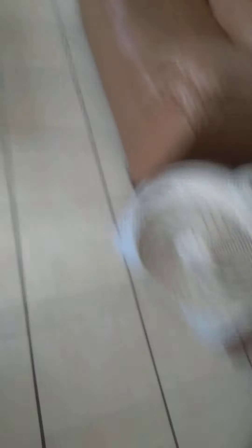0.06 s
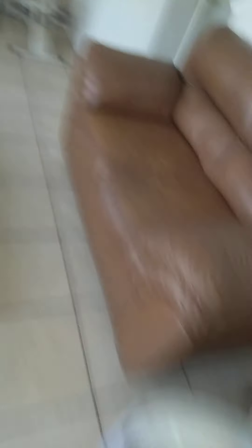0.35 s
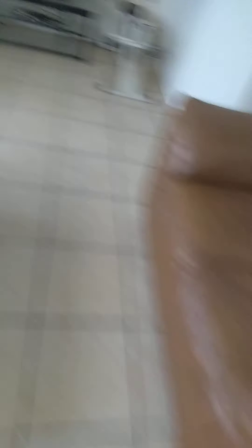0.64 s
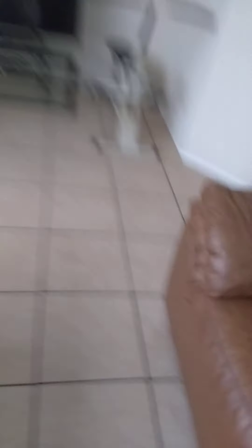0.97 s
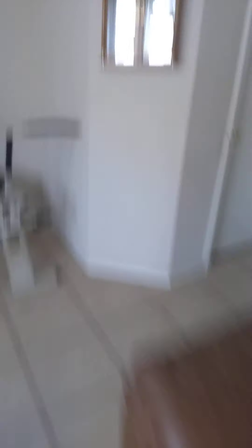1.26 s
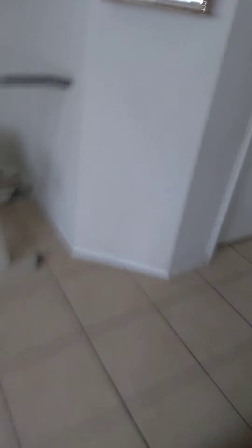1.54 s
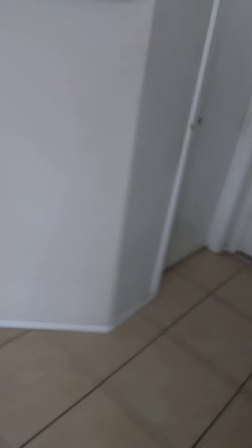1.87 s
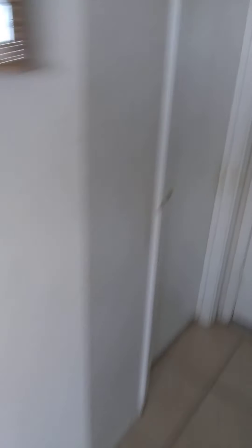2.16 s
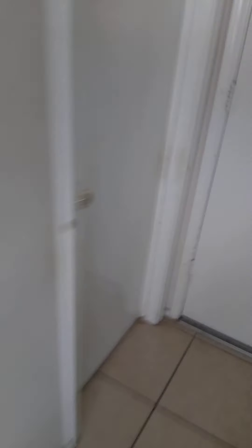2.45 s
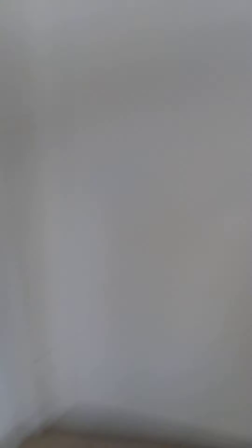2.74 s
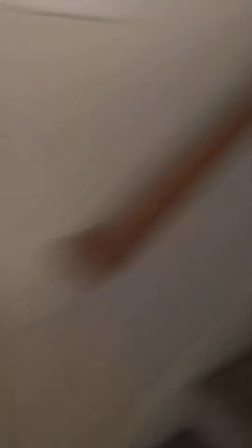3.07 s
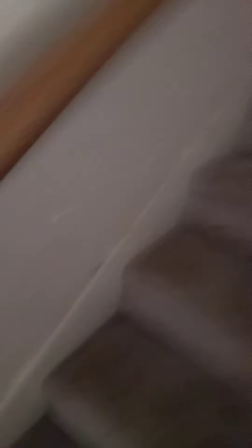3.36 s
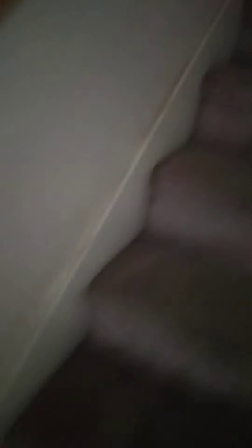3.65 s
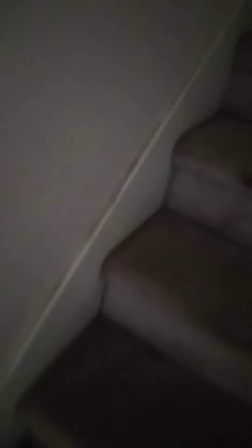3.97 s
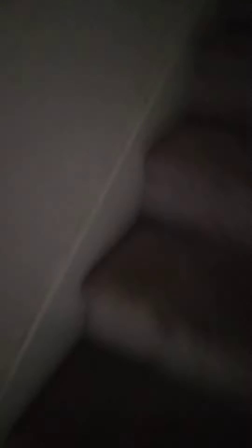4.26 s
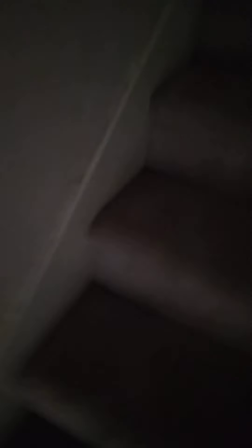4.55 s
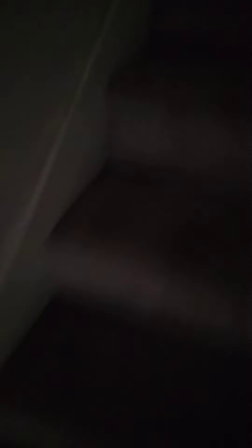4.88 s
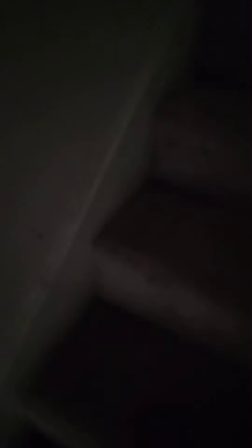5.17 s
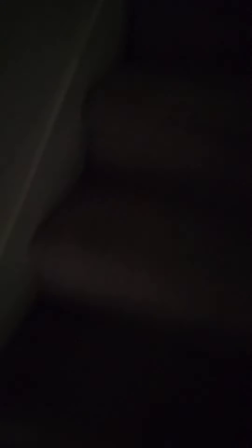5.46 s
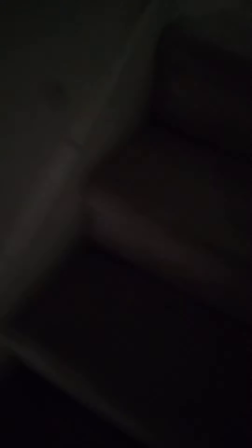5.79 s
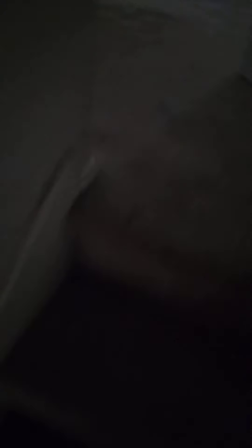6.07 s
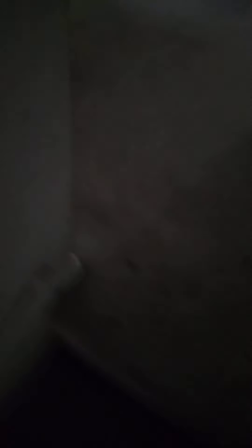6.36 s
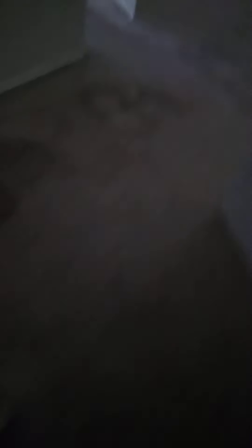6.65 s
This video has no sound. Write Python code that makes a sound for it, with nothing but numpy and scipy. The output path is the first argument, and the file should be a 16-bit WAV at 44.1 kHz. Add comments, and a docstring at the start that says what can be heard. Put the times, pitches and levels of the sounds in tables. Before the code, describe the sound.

Heard from a microphone carried by the walker, brisk footsteps cross a bare tiled room with hard slaps, sliding soles and soft bumps of air. They then change to quick, even thuds climbing a carpeted wooden staircase, which booms underfoot and cracks sharply once near the end. Clothes rustle throughout, and a fan rushes faintly in the background.

```python
"""Footsteps over a tiled floor, then up a carpeted wooden staircase, on the stereo microphone of a
camera that the walker carries. In a live room with a faint fan, heels and soles slap and scuff on the
tile; on the stairs each foot knocks the tread, crunches the pile and sets the staircase booming.
Close by, clothes rustle and moving air bumps the microphone."""
import sys
import numpy as np
from scipy import signal
from scipy.fft import rfft, irfft
from scipy.io import wavfile
from scipy.ndimage import uniform_filter1d

SR = 44100
rng = np.random.default_rng(int(sys.argv[2]) if len(sys.argv) > 2 else 0)


def put_to_file(sound):
    """Save the sound as 16-bit audio at rate SR, in the file named by the first command-line argument."""
    columns = np.atleast_2d(sound).T  # one column per channel
    safe = np.clip(columns, -1, 1)
    whole_steps = np.round(safe * 32767)
    wavfile.write(sys.argv[1], SR, whole_steps.astype(np.int16))


N = 305172
TIME = np.arange(N) / SR

# slaps on tile: t/s, hollow heel/dB, flat sole/dB, bright snap/dB
TILE_SLAPS = [(0.5545, -26.5, -25, -44), (0.758, -35, -35.5, -101), (0.944, -33.5, -35.5, -58.5),
              (1.175, -35, -47.5, -67), (1.231, -39.5, -57, -69), (1.373, -38.5, -29.5, -50),
              (1.7044, -34.5, -35.5, -59), (1.766, -43, -37, -53), (1.838, -37, -34.5, -56),
              (2.187, -42, -35, -77), (2.215, -47, -40.5, -53), (2.323, -40, -31.5, -49),
              (2.716, -36.5, -33.5, -55.5), (2.863, -45, -47, -57), (3.202, -29, -29, -53.5)]
# feet landing on stairs: t/s, knock/dB, tread tuning/ratio, boom/dB, boom pitch/Hz, boom t60/s,
# delay of the weight/s, crunch/dB, pad/dB, left minus right/dB, brush/dB, skim/dB
LANDINGS = [(3.199, -31.5, 0.73, -44, 76.1, 0.59, 0.011, -43.5, -47.5, 1.5, -56.5, -54.5),
            (3.576, -21.5, 1, -41.5, 69.4, 0.45, 0.0027, -42.5, -39.5, 0, -50, -46.5),
            (3.863, -24.5, 0.8, -28.5, 70.6, 0.24, 0.012, -49, -41, 2, -53.5, -57),
            (4.192, -26, 1.07, -22, 66.4, 0.31, 0.0082, -42, -41, 2, -55, -53),
            (4.486, -26.5, 1.125, -25, 66.4, 0.24, .019, -45.5, -43.5, 2, -52, -72),
            (4.801, -26, 1.06, -24, 62.3, 0.31, 0.011, -45, -36, 2, -56.5, -49.5),
            (5.096, -26.5, 1.32, -23, 58.2, .28, 0.01703, -46, -42, -0.5, -49.5, -54.5),
            (5.395, -28.5, 1.07, -14.5, 58.3, 0.14, 0.0087, -43, -39.5, 3, -57, -49),
            (5.699, -32, .95, -27, 58.4, 0.27, 0.01275, -51.5, -50, 3.5, -54, -53.5),
            (5.993, -24, 0.88, -22, 64.9, 0.22, 0.0092, -48.5, -37.5, 2, -56, -51.5),
            (6.275, -27.5, 0.69, -28, 65.6, 0.24, 0.011, -46.5, -41.5, 4.5, -50.5, -56),
            (6.58, -25.5, 0.85, -31.5, 68, 0.23, 0.0121, -44, -37, 2.5, -55, -50),
            (6.876, -28, 1.22, -41, 72.6, 0.26, 0.0018, -46.5, -40, 3.5, -49, -44)]
# how briskly the walker moves: t/s, shuffle of soles/dB, rustle of clothes/dB
BRISKNESS = [(0.0, -48.5, -62.5), (0.79, -53.5, -61), (1.02, -59.5, -69.5), (1.39, -55.5, -60.5),
             (1.54, -65.5, -69), (2.72, -57, -67), (3.03, -60, -73.5), (3.35, -60, -69), (4.14, -65, -71),
             (4.35, -55.5, -62.5), (4.63, -58.5, -64), (4.93, -59.5, -69), (5.95, -58.5, -67),
             (6.21, -55, -65), (6.34, -61, -66.5), (6.92, -55, -65.5)]
# spectrum of a flat, hard contact: f/Hz, level/dB
SLAP_SPECTRUM = [(60, -22.5), (150, 0.5), (350, -6.5), (800, 2), (1400, -3.5), (2200, -7), (4000, -46)]
# reverberation of the stairwell: f/Hz, t60/s
STAIRWELL_DECAY = [(100, 0.54), (400, 0.44), (1000, 0.18), (3000, 0.22)]


def gain_of(db):
    """Decibels to amplitude."""
    return 10 ** (np.asarray(db) / 20)


def unit_rms(x):
    """Scales to rms 1."""
    return x / np.sqrt(np.mean(x ** 2) + 1e-20)


def read(points, hz):
    """Reads a table on a log-frequency axis."""
    f, value = np.transpose(points)
    return np.interp(np.log(hz + 1), np.log(f + 1), value)


def add(mix, s, sound):
    """Adds a sound to the mix at time s."""
    part = mix[:, max(round(s * SR), 0):][:, :sound.shape[1]]
    part += sound[:, :part.shape[1]]


def stroke(at, db, half):
    """A bell-shaped swell and fade around time at."""
    return gain_of(db) * np.exp(-.5 * np.minimum(((TIME - at) / half) ** 2, 200))


def colour(x, spectrum, size=4096):
    """Minimum-phase filter of unit energy with the given spectrum."""
    log_gain = np.log(gain_of(read(spectrum, abs(np.fft.fftfreq(size, 1 / SR)))))
    taps = np.fft.ifft(np.exp(np.conj(signal.hilbert(log_gain)))).real[:size // 2]
    return signal.oaconvolve(x, taps[None] / np.linalg.norm(taps), axes=1)[:, :N]


def grit(grain_db, size=90):
    """Two noises whose strength jumps together, in grains of size samples."""
    grains = unit_rms(uniform_filter1d(rng.standard_normal(N), size))
    return unit_rms(rng.standard_normal((2, N)) * gain_of(grain_db * np.clip(grains, -2.5, 2.5)))


def impacts(times, levels_db, spectrum, rise, fall, t60, wet_db, grain_db=2.0):
    """Gritty contacts that swell over rise s and die over fall s, each with the room's diffuse tail."""
    force, t = np.zeros((1, N)), TIME[:SR // 2]
    shape = (1 - np.exp(-(t / rise) ** 2)) * np.exp(-t / fall)
    for s, db in zip(times, levels_db):
        add(force, s, gain_of(db) * shape[None] / shape.max())
    keep = np.exp(-2 * np.log(1000) / (t60 * SR))  # share of energy the room keeps per sample
    stored = signal.lfilter([1 - keep], [1, -keep], force ** 2 + 1e-20)
    tail = gain_of(wet_db) * np.sqrt(stored) * rng.standard_normal((2, N))
    return colour(grit(grain_db, size=30) * force + tail, spectrum)


def stairwell(x, wet_db, spacing=20, places=4):
    """Sparse reflections, each band dying at its own speed; they change as the walker moves on."""
    taps = np.zeros((places, 2, SR))
    at = np.arange(10 * spacing, SR - spacing, spacing)
    at = at + rng.integers(0, spacing, (places, 2, len(at)))
    np.put_along_axis(taps, at, rng.choice([-1., 1.], at.shape), 2)
    hz, t, spectra = signal.stft(taps, SR, nperseg=256)
    decay = gain_of(-60 * t / read(STAIRWELL_DECAY, hz)[:, None])
    tails = signal.istft(spectra * decay, SR, nperseg=256)[1]
    place = (TIME * 3.1).astype(int) % places  # moves on about once a step
    wet = sum(signal.fftconvolve(x * (place == k), tail / np.linalg.norm(tail[0]), axes=1)[:, :N]
              for k, tail in enumerate(tails))
    return x + gain_of(wet_db) * wet


def mottle(x, patchy_db=3.0):
    """Shifting contacts and reflections colour the sound in patches some 200 Hz wide and 50 ms long."""
    spectra = signal.stft(x, nperseg=1024, noverlap=768)[2]
    patches = rng.standard_normal(spectra.shape[:0:-1]).T
    patches = unit_rms(uniform_filter1d(uniform_filter1d(patches, 5, axis=0), 9, axis=1))
    mottled = spectra * gain_of(patchy_db * patches - 1.0)
    return signal.istft(mottled, nperseg=1024, noverlap=768)[1][:, :N]


def microphone(x, ripple_hz=2110):
    """Diffuse sound at the two ports: the sides swing in and out of phase along the frequency axis."""
    # likeness of the ports: f/Hz, depth/0-1
    likeness = [(60, .8), (250, .45), (900, .8), (2100, .985), (4200, .93), (6300, .75), (9000, .35),
                (14000, .15)]
    # balance of the ports: f/Hz, left minus right/dB
    balance = [(60, 4.5), (300, 2.2), (800, 1), (3000, 1.4), (8000, 2.4), (14000, 2.3)]
    hz = np.fft.rfftfreq(2 * N, 1 / SR)
    swing = abs(np.sin(np.pi * np.maximum(hz / ripple_hz, .5))) ** 1.8
    coherence = (2 * swing - 1) * read(likeness, hz)
    mid, side = rfft(x, 2 * N) * np.sqrt([(1 + coherence) / 2, (1 - coherence) / 2])
    lean = gain_of(read(balance, hz) / 2)
    return irfft(np.array([(mid + side) * lean, (mid - side) / lean]))[:, :N]


def fan(level_db=-62):
    """Room tone: the faint, even rush of a fan's air."""
    # rushing air: f/Hz, level/dB
    spectrum = [(25, -9), (60, 9), (120, 0.5), (300, -0.5), (900, -22.5), (2000, -20), (3500, -18.5),
                (6000, -21.5), (14000, -26)]
    return gain_of(level_db) * colour(rng.standard_normal((2, N)), spectrum)


def draught(start_db=-57.5, fall_db_per_s=1):
    """Air bumps the moving microphone: low puffs over a draught that dies away as the walker slows."""
    # puffs of air: middle t/s, level/dB, half length/s
    puffs = [(0.284, -46.5, 0.013), (0.83, -38.5, 0.032), (0.923, -39.5, .022), (1.62, -44, .05),
             (1.69, -43, 0.023), (2.204, -43.5, 0.034)]
    # lumpy pressure at the ports: f/Hz, level/dB
    spectrum = [(20, 10), (45, -3.5), (70, 7.5), (110, 0.5), (180, -6), (350, -22.5), (900, -57)]
    lumps = colour(grit(3.9, size=900), spectrum)
    return lumps * (gain_of(start_db - fall_db_per_s * TIME) + sum(stroke(*row) for row in puffs))


def sole_roll(peak_s=0.028, tile_db=-19.5, stair_db=-12):
    """Envelope of the sole rolling down after every footfall: a quick swell and a slower fade."""
    out, u = np.zeros((1, N)), TIME[:SR // 2] / peak_s
    swell = (u * np.exp(1 - u))[None]
    for s, _, sole_db, _ in TILE_SLAPS:
        add(out, s, gain_of(sole_db + tile_db) * swell)
    for s, *_, pad_db, _, _, _ in LANDINGS:
        add(out, s, gain_of(pad_db + stair_db) * swell)
    return out[0]


def clothes(shake_db=-10, fold_db=-7, folds_per_s=90):
    """Cloth near the microphone rustles all along and shakes after each footfall; small folds snap."""
    # rustling cloth: f/Hz, level/dB
    spectrum = [(700, -20), (1900, -1), (3300, -2), (5000, -8), (7000, -14), (10000, -18), (14000, -32)]
    s, _, rustle_db = np.transpose(BRISKNESS)
    moving = gain_of(np.interp(TIME, s, rustle_db) + 0.5)
    rustling = np.hypot(moving, gain_of(shake_db) * sole_roll())
    folds = unit_rms(rng.standard_normal((2, N)) * (rng.random(N) < folds_per_s / SR))
    cloth = grit(0.53) + gain_of(fold_db) * folds
    return colour(cloth * rustling, spectrum)


def swishes():
    """Short swishes of cloth, plus one brief crunch underfoot just after the first stair landing."""
    # swishes and the one crunch: middle t/s, level/dB, half length/s
    strokes = [(0.153, -57.5, 0.051), (1.306, -52, 0.031), (1.406, -68, .016), (2.294, -60, 0.027),
               (3.072, -58, 0.013), (3.236, -47, 0.0064), (3.479, -48.5, 0.014), (4.095, -56, 0.012),
               (4.688, -52, 0.015), (5.64, -56.5, 0.015), (6.134, -54.5, 0.056), (6.436, -59.5, .026)]
    # brushing noise: f/Hz, level/dB
    spectrum = [(600, 5.5), (1700, 7.5), (3200, 2.5), (5000, -2), (9000, -6), (12000, -11.5), (14500, -11)]
    return colour(grit(1.5) * sum(stroke(*row) for row in strokes), spectrum)


def shuffle():
    """Soles rub the floor all along, louder as each foot rolls down."""
    # rubbing soles: f/Hz, level/dB
    spectrum = [(60, -28.5), (180, 3), (500, 1.5), (950, -1.5), (1500, -7.5), (2300, -8), (4000, -36.5)]
    s, shuffle_db, _ = np.transpose(BRISKNESS)
    shuffling = np.hypot(gain_of(np.interp(TIME, s, shuffle_db)), sole_roll())
    return colour(grit(0.71, size=300) * shuffling, spectrum)


def scuffs(skim_lead_s=0.021, skim_hz=850, skim_ratio=1.82):
    """A sliding sole catches and slips: gritty noise in one band. It also skims each stair on landing."""
    # slides between landings: middle t/s, level/dB, half length/s, centre f/Hz, band edge over centre
    slides = [(0.17, -39.5, 0.045, 580, 1.62), (0.172, -42.5, 0.054, 1420, 1.58),
              (0.43, -43.5, .032, 523, 1.5), (0.806, -45, 0.027, 580, 1.76), (0.942, -47, 0.065, 850, 1.64),
              (1.962, -53, 0.073, 1400, 1.13), (2.268, -43.5, 0.027, 1150, 1.64),
              (2.594, -55.5, 0.074, 880, 1.18), (2.84, -46, 0.037, 890, 1.82),
              (6.553, -42, 0.0096, 710, 1.07), (6.646, -37, 0.016, 916, 1.1)]
    out, friction = np.zeros((2, N)), grit(3.6, size=140)
    skims = sum(stroke(s - skim_lead_s, db, half=0.027) for s, *_, db in LANDINGS)
    rubs = [(stroke(s, db, half), hz, ratio) for s, db, half, hz, ratio in slides]
    for pressure, hz, ratio in rubs + [(skims, skim_hz, skim_ratio)]:
        band = signal.butter(2, [hz / ratio, hz * ratio], "band", fs=SR, output="sos")
        width_share = hz * (ratio - 1 / ratio) / (SR / 2)
        out += gain_of(-4.0) * signal.sosfilt(band, friction * pressure) / np.sqrt(width_share)
    return stairwell(out, wet_db=-7.5)


def cracks():
    """Shoes and stair boards crack under the load: a bright tick with a duller clack."""
    # cracks: t/s, treble/dB, body/dB
    events = [(.278, -59, -69), (0.46, -40, -38), (0.564, -51, -34), (4.245, -38, -36.5),
              (4.329, -47, -41.5), (4.369, -46, -49), (4.404, -47, -58), (4.851, -65, -56),
              (5.137, -48, -52), (5.262, -45, -53), (6.3107, -25, -30.5), (6.542, -52, -38),
              (6.636, -38.5, -37)]
    # bright tick: f/Hz, level/dB
    tick_spectrum = [(500, -4), (1500, -9.5), (2400, 10.5), (3100, -1), (4200, -4.5), (7000, -14.5),
                     (14000, -25)]
    s, treble_db, body_db = np.transpose(events)
    ticks = impacts(s, treble_db - 1.5, tick_spectrum, rise=0.0006, fall=0.0028, t60=0.22, wet_db=-6.5)
    clacks = impacts(s, body_db - 3.5, SLAP_SPECTRUM, rise=0.001, fall=0.0046, t60=0.33, wet_db=-0.5)
    return ticks + clacks


def stair_carpet(brush_lead_s=0.011, press_lag_s=0.0035, roll_lag_s=0.004, roll_db=-4.0):
    """The sole brushes the carpet, pads into it and crunches its pile twice as it rolls down."""
    # pile under a skimming sole: f/Hz, level/dB
    brush_spectrum = [(600, 2), (1700, 3), (3200, 2), (5000, -5.5), (9000, -5), (12000, -8.5), (14500, -18)]
    # cushioned landing: f/Hz, level/dB
    pad_spectrum = [(80, -15.5), (250, 3.5), (450, -4), (680, -2.5), (1300, -14), (2200, -19),
                    (4000, -36.5)]
    # pile being crushed: f/Hz, level/dB
    crunch_spectrum = [(600, -46), (1700, 7), (3200, 6), (4800, 1.5), (6300, -1), (9000, 0.5), (12000, -7),
                       (14500, -18)]
    s, *_, crunch_db, pad_db, _, brush_db, _ = np.transpose(LANDINGS)
    skimming = sum(stroke(at - brush_lead_s, db - 1.0, half=0.019) for at, db in zip(s, brush_db))
    brush = colour(grit(3.5, size=200) * skimming, brush_spectrum)
    pad = impacts(s, pad_db + 6.0, pad_spectrum, rise=0.0036, fall=0.013, t60=0.38, wet_db=-5.5)
    press_s = np.r_[s, s + roll_lag_s] + press_lag_s
    press_db = np.r_[crunch_db, crunch_db + roll_db] + 2.0
    crunch = impacts(press_s, press_db, crunch_spectrum, rise=0.003, fall=0.0026, t60=0.23,
                     wet_db=-6, grain_db=5.5)
    return brush + pad + crunch


def tile_steps():
    """Short, hard slaps on tile; much of their sound reaches the microphone by way of the bare room."""
    # hollow heel: f/Hz, level/dB
    heel_spectrum = [(60, -19), (180, -14), (330, 9), (560, 1), (800, -27.5), (1500, -14.5), (3000, -40)]
    # bright snap: f/Hz, level/dB
    snap_spectrum = [(500, -20), (1500, -21), (2200, 10.5), (3500, 6.5), (5500, -2.5), (9000, -8.5),
                     (14000, -18)]
    s, heel_db, sole_db, snap_db = np.transpose(TILE_SLAPS)
    heel = impacts(s, heel_db - 2.5, heel_spectrum, rise=0.00036, fall=0.0052, t60=0.27, wet_db=1.0)
    sole = impacts(s, sole_db - 6.0, SLAP_SPECTRUM, rise=0.001, fall=0.008, t60=0.57, wet_db=2.5)
    snap = impacts(s, snap_db - 3.5, snap_spectrum, rise=0.0005, fall=0.011, t60=0.43, wet_db=11.5)
    return heel + sole + snap


def stair_wood(boom_rise_s=0.01175, knock_rise_s=0.0017, knock_lean_db=4, jolt_db=-9):
    """The tread knocks at first touch; then the weight jolts it again and the whole staircase booms."""
    # modes of a tread: f/Hz, level/dB, t60/s
    tread_modes = [(121.7, 6, 0.17), (169, -1, 0.27), (209.5, 6, 0.12), (264.2, 3.5, 0.13), (296, 2, 0.12),
                   (371.8, 0.5, 0.12), (449, -4.5, 0.12), (578, -12, 0.13)]
    # modes of the staircase: multiple of the boom pitch, level/dB, multiple of the boom t60
    frame_modes = [(0.838, -9.5, 1), (1.001, 4, 1.06), (1.17, -7.5, 1.1), (1.5, -7.5, 1.04),
                   (2.05, -8, .65), (2.7, -13.5, 0.89)]
    out, t = np.zeros((2, N)), TIME[:SR * 3 // 4]
    sides = np.array([[.5], [-.5]])

    def knock(tuning):
        """Every spot on a tread rings a little differently."""
        ringing = 0
        for hz, db, t60 in tread_modes:
            detune, skew = rng.normal(size=2)
            turns = hz * tuning * (1 + 0.0548 * detune) * t + 0.33 * skew * sides
            ringing = ringing + gain_of(db - 60 * t / t60) * np.cos(2 * np.pi * turns)
        return ringing * (1 - np.exp(-(t / knock_rise_s) ** 2)) * gain_of(knock_lean_db * sides)

    def boom(hz, t60):
        """Each mode of the staircase reaches the two ports at its own phase."""
        ringing = 0
        for multiple, db, share in frame_modes:
            turns = multiple * hz * t + rng.normal() * .07 + rng.uniform(-.3, .3) * sides
            ringing = ringing + gain_of(db - 60 * t / (t60 * share)) * np.sin(2 * np.pi * turns)
        return ringing * (1 - np.exp(-(t / boom_rise_s) ** 2))

    for s, knock_db, tuning, boom_db, boom_hz, t60, delay, _, _, lean_db, _, _ in LANDINGS:
        lean = gain_of(lean_db * sides)
        strength = gain_of(knock_db - 6.0) * lean
        add(out, s + delay, boom(boom_hz, t60) * gain_of(boom_db + 3.5) * lean)
        add(out, s, knock(tuning) * strength)
        add(out, s + delay + boom_rise_s, knock(tuning) * strength * gain_of(jolt_db))
    return stairwell(out, wet_db=-14)


def scene():
    """The walk as heard at the camera: diffuse contacts and air, plus the ringing wood underfoot."""
    contacts = tile_steps() + scuffs() + stair_carpet() + cracks()
    rubbing = clothes() + shuffle() + swishes()
    return microphone(mottle(contacts + rubbing) + draught() + fan()) + stair_wood()


def record(dry, low_hz=44, high_hz=14300):
    """The recorder drops the deepest bass and the top of the treble."""
    low_cut = signal.butter(4, low_hz, "high", fs=SR, output="sos")
    high_cut = signal.firwin(1023, high_hz, window=("kaiser", 9), fs=SR)
    return signal.oaconvolve(signal.sosfilt(low_cut, dry), high_cut[None], "same")


dry = scene()
out = record(dry)
put_to_file(out)
```